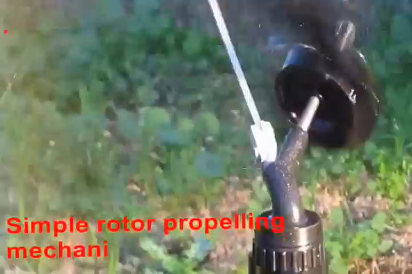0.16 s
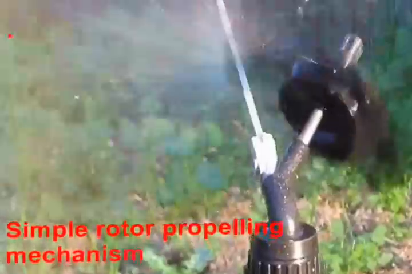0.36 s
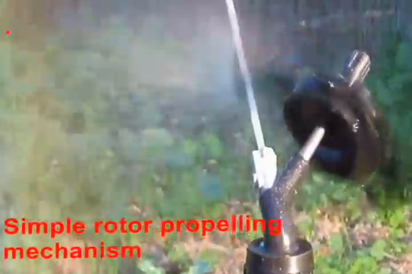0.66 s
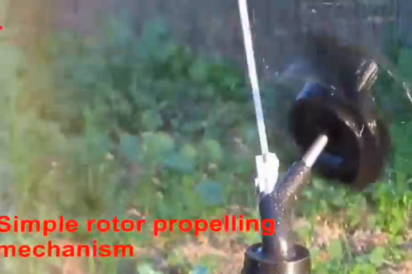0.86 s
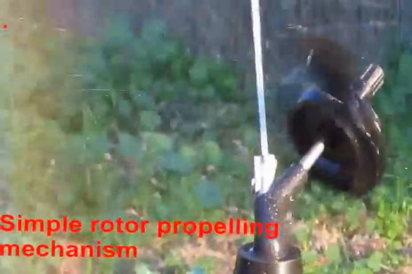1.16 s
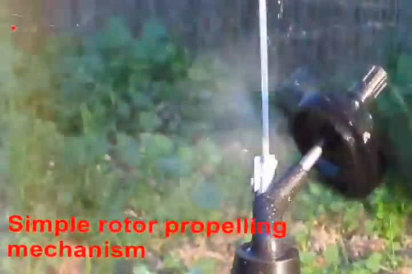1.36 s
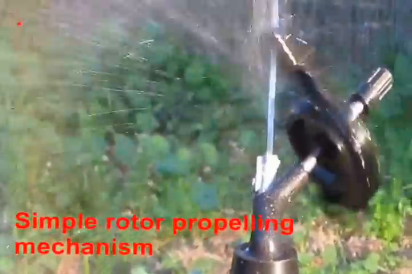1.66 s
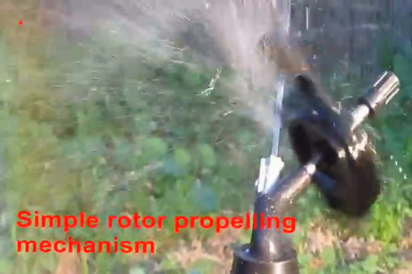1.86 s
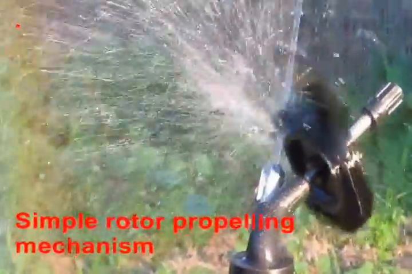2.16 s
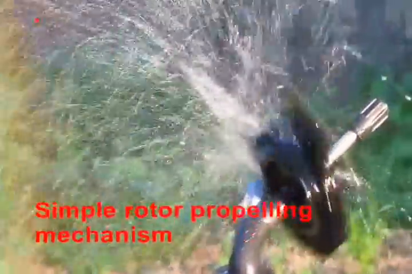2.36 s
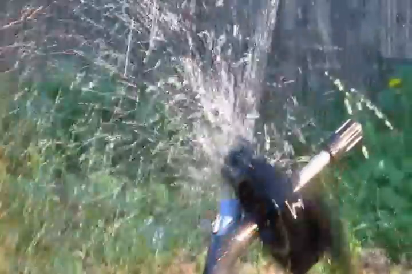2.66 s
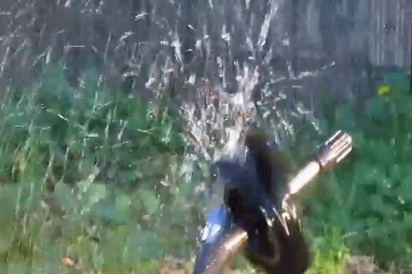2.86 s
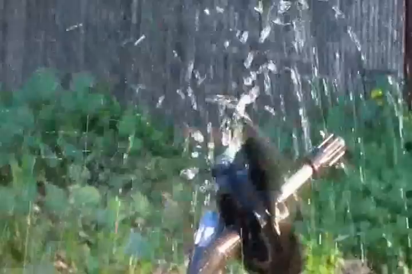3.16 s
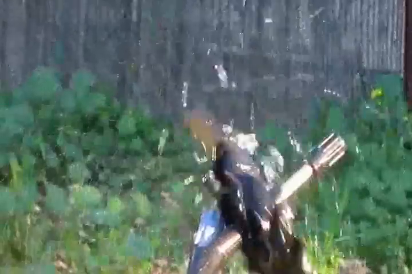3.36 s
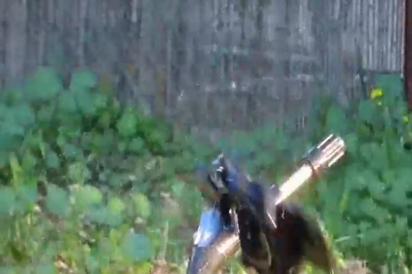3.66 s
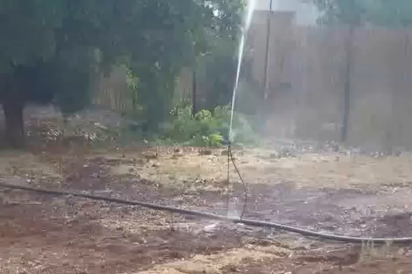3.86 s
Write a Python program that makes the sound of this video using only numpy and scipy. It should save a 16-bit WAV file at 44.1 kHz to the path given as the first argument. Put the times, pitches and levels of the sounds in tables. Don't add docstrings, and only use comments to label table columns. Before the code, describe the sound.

A sprinkler's spinning vane chops a water jet in fast, regular wet slaps over steady hiss.

```python
import sys
import numpy as np
from scipy import signal
from scipy.io import wavfile
from scipy.ndimage import uniform_filter1d

SR = 44100
rng = np.random.default_rng(int(sys.argv[2]) if len(sys.argv) > 2 else 0)


def bounce(signal):
    frames = np.transpose(np.atleast_2d(signal))
    limited = np.clip(frames, -1, 1)
    pcm = np.round(limited * 32767).astype(np.int16)
    wavfile.write(sys.argv[1], SR, pcm)


def boost_factor(decibels):
    exponent = np.asarray(decibels, float) / 20
    return 10 ** exponent


N = 176400

FADE_FROM_S, FADE_TO_S = 2.885, 3.845
SOFT_EDGE_HZ = 15800
PASS_MS = np.arange(2000) * 1000 / SR


def evened(x):
    return x / np.sqrt(np.mean(x ** 2) + 1e-20)


def coloured(x, points):
    hz = abs(np.fft.fftfreq(8192, 1 / SR))
    point_hz, point_db = np.transpose(points)
    log_gain = np.interp(np.log(hz + 1), np.log(point_hz + 1), point_db) * np.log(10) / 20
    taps = np.fft.ifft(np.exp(np.conj(signal.hilbert(log_gain)))).real[:4096]
    return signal.oaconvolve(x, taps / np.linalg.norm(taps))[:len(x)]


def edged(x, hz):
    return signal.oaconvolve(x, signal.firwin(511, hz, window=("kaiser", 8), fs=SR), "same")


def blend(x, first, second, share):
    share = np.clip(share, 0, 1)
    return np.sqrt(1 - share) * coloured(x, first) + np.sqrt(share) * coloured(x[::-1], second)


def ring(x, hz, width_hz):
    radius = np.exp(-np.pi * width_hz / SR)
    angle = 2 * np.pi * hz / SR
    return evened(signal.lfilter([1], [1, -2 * radius * np.cos(angle), radius ** 2], x))


def bump(ms, at, width):
    return np.exp(-.5 * ((ms - at) / width) ** 2)


def burst(shape, noise):
    x = shape * noise
    return x * np.linalg.norm(shape) / (np.linalg.norm(x) + 1e-12)


def add(mix, s, sound):
    part = mix[max(round(s * SR), 0):][:len(sound)]
    part += sound[:len(part)]


def fade():
    return np.clip((FADE_TO_S - np.arange(N) / SR) / (FADE_TO_S - FADE_FROM_S), 0, 1)


def control(column):
    # time_s, hiss_level_db, vane_bite [0-1]
    head_turn = [(0, -36, 1), (0.053, -32.5, 0.75), (0.132, -40.5, 0.42), (1.051, -42.5, 0.56),
                 (1.4, -42, 0.83), (1.952, -39.5, 0.88), (2.3, -40.5, 0.82), (2.55, -41, 0.9),
                 (2.75, -42.5, 0.9), (2.95, -44, 0.95), (3.201, -42, 0.9), (3.85, -42.5, 0.94)]
    points = np.array(head_turn)
    return np.interp(np.arange(N) / SR, points[:, 0], points[:, column])


def droplets(grain_ms, spread_db):
    decay = np.exp(-1000 / (grain_ms * SR))
    flicker = evened(signal.lfilter([1], [1, -decay], rng.standard_normal(N)))
    return evened(rng.standard_normal(N) * boost_factor(spread_db * flicker))


def jet():
    # frequency_hz, density_db
    hiss_colour = [(30, -3), (130, -1), (400, -10.5), (1660, -9), (4370, -10.5), (5120, -5), (11800, -11),
                   (15800, -4)]
    # frequency_hz, density_db
    mist_colour = [(30, -3), (100, 4.5), (400, -3.5), (971, -2), (3000, -4), (5600, -6.5), (9820, -7),
                   (15000, -12.5)]
    falling = blend(droplets(grain_ms=1.5, spread_db=0.43), hiss_colour, mist_colour, control(column=2))
    z = signal.stft(falling, nperseg=256)[2]
    patches = uniform_filter1d(rng.standard_normal(z.shape), 12, 0)
    patches = evened(uniform_filter1d(patches, 8, 1))
    patchy = signal.istft(z * boost_factor(0.72 * patches), nperseg=256)[1][:N]
    return edged(evened(patchy), SOFT_EDGE_HZ) * boost_factor(control(column=1)) * fade()


def passes():
    # start_s, spray_db, slap_delay_ms, slap_db, contact_change_ms, low_splash_change_db
    splashes = [
        (.008, -21.5, 9, -25, 1.5, 0),
        (0.0221, -30, 3, -21, -3, -6),
        (0.0698, -20.5, 2.5, -25, -4, -9.5),
    ]
    # start_s, spray_db, slap_delay_ms, slap_db, slap_ring_hz
    grazing = [(0.0903, -28, 2.44, -17, 5730), (0.158, -30, 4.4, -17.5, 5460),
               (0.2268, -32, 3.8, -16.5, 5750), (0.2962, -31.5, 3.4, -18.5, 6300),
               (0.365, -31, 3.75, -16.5, 5050), (0.4333, -29.5, 4, -18, 6100),
               (0.5019, -29.5, 4.24, -16, 6080), (0.5721, -33, 2.77, -16, 5570),
               (0.6409, -30.5, 4.5, -17.5, 5260), (0.7112, -30, 3.1, -17, 5100),
               (0.7816, -30.5, 2.95, -18, 5620), (0.8498, -31, 3.56, -17.5, 5670),
               (0.9184, -29.5, 3, -17, 7060), (0.9884, -27.5, 3.6, -15.5, 6460),
               (1.055, -29, 3.5, -16.5, 5970), (1.1222, -27.5, 2.1, -21.5, 6900),
               (1.1897, -28, 3.25, -17, 6330), (1.255, -27.5, 0.75, -20.5, 6700),
               (1.3201, -29, 0.59, -26, 5440), (1.3842, -28, 3.1, -13, 6660)]
    # start_s, spray_db, slap_delay_ms, slap_db
    biting = [(1.447, -27, 1.9, -28), (1.5109, -26.5, 4.2, -19.5), (1.5753, -27.5, 4.2, -40),
              (1.6378, -28, 0.87, -15.5), (1.7007, -27, 12, -23), (1.7646, -24.5, 8.9, -26.5),
              (1.8275, -27.5, 1.1, -16), (1.8907, -25, 0.34, -24), (1.9528, -26.5, 10.9, -37),
              (2.0159, -25.5, 3.5, -20), (2.079, -24.5, 1.2, -32), (2.1418, -27, 10.8, -15.5),
              (2.2034, -24.5, 12.3, -21.5), (2.2661, -25, 2.8, -41), (2.3282, -25.5, 4.3, -22.5),
              (2.3885, -26.5, 7.3, -36), (2.4486, -27, 0.71, -36), (2.5098, -27.5, 3.6, -15.5),
              (2.5697, -27, 1.05, -22), (2.6297, -27, 8.0, -16)]
    # start_s, spray_db, slap_delay_ms, slap_db
    receding = [(2.6887, -28, 0.92, -14), (2.748, -28.5, 1.5, -20), (2.8061, -30.5, 8.5, -44),
                (2.8646, -29.5, 4.7, -39), (2.9239, -30.5, 1.7, -25), (2.9831, -30, 5.6, -27),
                (3.0413, -32.5, 8.7, -37), (3.1011, -30, 3.6, -40), (3.1589, -32, 9.8, -26),
                (3.2185, -32.5, 9.3, -26), (3.2767, -32.5, 1.1, -33), (3.3352, -32.5, 1.8, -37),
                (3.394, -35, 0.79, -26), (3.4526, -36.5, 10.2, -25), (3.5112, -39, 1.8, -26),
                (3.5705, -39, 0.26, -29), (3.6287, -42, 8.2, -47), (3.6874, -44.5, 3.7, -36),
                (3.7456, -47.5, 18, -47), (3.804, -58, 1.15, -42.5)]

    def with_usual_ring(table):
        return [tuple(row[:4]) + (5800,) for row in table]

    rows = with_usual_ring(splashes) + [tuple(row) for row in grazing]
    rows = np.array(rows + with_usual_ring(biting) + with_usual_ring(receding))
    trims = np.zeros((len(rows), 2))
    trims[:len(splashes)] = np.array(splashes)[:, 4:]
    return rows, trims


def held_spray(level_db, deep, after_ms):
    rise_ms, shed_ms, sag_db_per_ms = 0.55, 6, -0.24
    shed_gain = boost_factor(-8)
    level = boost_factor(level_db + sag_db_per_ms * (0.5 - deep) * (PASS_MS + 4.0))
    shed = shed_gain * np.exp(-(after_ms / shed_ms) ** 2) + np.exp(-after_ms / .6)
    return level * np.minimum(PASS_MS / rise_ms, 1) * shed / (1 + shed_gain)


def low_splash(level_db, after_ms):
    lag_ms, fall_ms = 1.6, 3.1
    rise = np.minimum(PASS_MS / 1.8, 1)
    return boost_factor(level_db) * rise * np.exp(-np.maximum(after_ms - lag_ms, 0) / fall_ms)


def slap_shape(at_ms, entry_chance, rebound_chance):
    entry = boost_factor(-14 + 2 * entry_chance) * bump(PASS_MS, 0.43 * at_ms, 0.2 * at_ms + .1)
    rebound = boost_factor(-13.5 + 2 * rebound_chance) * bump(PASS_MS, at_ms + 3.04, 1.0)
    return bump(PASS_MS, at_ms, 0.46) + entry + rebound


def thud(level_db, stop_ms):
    return boost_factor(level_db - 15) * bump(PASS_MS, stop_ms, 3.35) * np.sin(2 * np.pi * 259 * PASS_MS / 1000)


def spray_noise(bite):
    # frequency_hz, level_db
    thin_colour = [(180, -27), (300, -20.5), (2350, -11), (3160, 5), (5650, -0.5), (6560, -4.5),
                   (10400, 8.5), (15800, -3)]
    # frequency_hz, level_db
    full_colour = [(180, -42.5), (300, -13), (2050, -1.5), (5940, -0.5), (7250, -1.5), (9770, 1),
                   (12900, -4), (15800, -9)]
    # frequency_hz, width_hz, level_db
    wheel_modes = [(694, 100, -10.5), (966, 65, -7), (1208, 54, -8.5), (1870, 150, -8.5), (2470, 240, -2.5)]
    spray = blend(droplets(grain_ms=0.2, spread_db=2.5), thin_colour, full_colour, bite)
    clumps = evened(uniform_filter1d(uniform_filter1d(rng.standard_normal(N), 60), 60))
    spray = edged(evened(spray * boost_factor(0.67 * clumps)), SOFT_EDGE_HZ)
    bass = signal.sosfilt(signal.butter(2, 1490, fs=SR, output="sos"), spray)
    stir = rng.standard_normal(N)
    wheel = sum(boost_factor(db - 10.5) * ring(stir, hz, width_hz) for hz, width_hz, db in wheel_modes)
    return spray - bass, bass + np.clip(bite, 0, 1) * wheel


def vane():
    # frequency_hz, level_db
    slap_colour = [(1000, -44), (2000, -30), (3140, -26.5), (5740, 1), (7500, -1.5), (9330, 1), (11400, 1),
                   (14400, -3), (16300, -48)]
    # frequency_hz, level_db
    tick_colour = [(500, 1), (2000, -6.5), (5000, -9.5), (10000, 6), (14500, 1), (16500, -20)]
    # time_s, peak_db
    stray_drops = [(.0355, -27), (.046, -31), (.0618, -24), (.4755, -40), (.5172, -23), (.6565, -19),
                   (1.107, -33), (3.013, -41), (3.62, -51), (3.6675, -53), (3.7985, -61)]
    deep_from_s, deep_by_s = 0.9, 1.9
    tick_ms = .2
    rows, trims = passes()
    turn_times_ms = 1000 * np.clip(np.gradient(rows[:, 0]), .058, .07)
    slap_noise = coloured(rng.standard_normal(N + 2000), slap_colour)
    hold, low, slaps, ticks, rung, thuds = np.zeros((6, N))
    chances = rng.standard_normal((len(rows), 6))
    noises = rng.standard_normal((len(rows), 2000))
    for row, turn_ms, chance, noise, trim in zip(rows, turn_times_ms, chances, noises, trims):
        s, spray_db, at_ms, slap_db, ring_hz = row
        contact_change_ms, low_db = trim
        deep = np.clip((s - deep_from_s) / (deep_by_s - deep_from_s), 0, 1)

        stop_ms = 0.19 * turn_ms + 3.5 * (1 - deep) * (s > .08) + 0.48 * chance[0] + contact_change_ms
        after_ms = np.maximum(PASS_MS - stop_ms, 0)
        add(hold, s, held_spray(spray_db, deep, after_ms))
        brush = (s > .1) * (1 - deep) * boost_factor(-43.5 + 3.1 * chance[5]) * bump(PASS_MS, 10.5, 2.2)
        add(hold, s - .022, brush)
        add(low, s, low_splash(spray_db + low_db + 1.6 * chance[3], after_ms))

        slap = (1 - deep) * boost_factor(slap_db) * slap_shape(at_ms, chance[1], chance[2])
        add(slaps, s, burst(slap, slap_noise[round(s * SR):][:len(PASS_MS)]))
        add(rung, s, burst(slap, ring(noise, ring_hz, width_hz=350)))

        dry_tick = deep * boost_factor(min(slap_db, spray_db + 13)) * bump(PASS_MS, at_ms, tick_ms)
        exit_tick = boost_factor(spray_db - 16 + 2.2 * chance[4]) * bump(PASS_MS, stop_ms - .4, tick_ms)
        add(ticks, s, burst(dry_tick, noise) + burst(exit_tick, noise[::-1]))
        add(thuds, s, thud(spray_db + low_db + 0.5 * chance[5], stop_ms))
    for s, db in stray_drops:
        tap = boost_factor(db) * bump(PASS_MS, 0.6, tick_ms)
        add(ticks, s, burst(tap, rng.standard_normal(len(PASS_MS))))
    spray, bass = spray_noise(control(column=2))
    crack = boost_factor(2.5) * slaps + boost_factor(1) * rung
    crack = signal.sosfilt(signal.butter(2, 2200, "high", fs=SR, output="sos"), crack)
    return hold * spray + low * bass + crack + coloured(ticks, tick_colour) + thuds


def hum():
    # time_s, pitch_hz, level_db
    motor_curve = [(0, 54, -47), (.1, 56, -51), (.17, 66, -64), (1.03, 67.5, -66), (1.18, 68, -57.5),
                   (1.5, 68, -50.5), (1.9, 68, -46), (2.2, 68, -49), (2.35, 68, -55), (2.55, 68, -51),
                   (2.78, 68, -56), (2.95, 68, -50), (3.16, 68, -59), (3.33, 68.4, -50.5), (3.55, 69, -57),
                   (3.75, 72, -52)]
    width_hz, sway_db = .8, .5
    wander = evened(signal.lfilter([1], [1, -np.exp(-30. / SR)], rng.standard_normal(N)))
    s, hz, db = np.transpose(motor_curve)
    t = np.arange(N) / SR
    pitch_hz = np.interp(t, s, hz) + width_hz * wander
    tone = np.sqrt(2) * np.sin(2 * np.pi * np.cumsum(pitch_hz) / SR)
    sway = sway_db * np.roll(uniform_filter1d(wander, 2000), SR)
    return tone * boost_factor(np.interp(t, s, db) + sway) * fade()


def knocks():
    # time_s, pitch_hz, width_ms, level_db
    wheel_knocks = [
        (.014, 921, 4, -30),
        (.0175, 2400, .9, -22),
        (.013, 4100, .8, -21),
        (.018, 9000, .5, -17),
        (.0677, 11500, .16, -4),
        (.0677, 7500, .14, -11),
        (.0765, 8200, .5, -17),
    ]
    ms = np.arange(N) * 1000 / SR
    mix = np.zeros(N)
    for s, hz, width_ms, db in wheel_knocks:
        mix += boost_factor(db) * bump(ms, 1000 * s, width_ms) * np.sin(2 * np.pi * hz * ms / 1000)
    return mix


def ending():
    # frequency_hz, level_db
    blip_colour = [(250, 1.5), (700, 4.5), (3130, 3.5), (5740, 0), (12300, -4), (15200, -3), (16500, -22.5)]
    blip_s, blip_ms, blip_db = 3.848, 7., -38.5
    t = np.arange(N) / SR
    tail_db = -83 - 120 * np.maximum(t - FADE_TO_S, 0)
    tail = boost_factor(tail_db) * edged(rng.standard_normal(N), SOFT_EDGE_HZ)
    ms = 1000 * (t - blip_s)
    release = boost_factor(-20.5 - 4.5 * np.maximum(ms - blip_ms, 0))
    gate = (ms > 0) * np.where(ms < blip_ms, 1, release)
    push = boost_factor(-41.5) * bump(ms, 3.8, 0.83) * (ms < blip_ms)
    thin_ring = boost_factor(-50.5) * gate * np.sin(2 * np.pi * 1040 * t)
    blip = boost_factor(blip_db) * gate * coloured(rng.standard_normal(N), blip_colour)
    return tail + push + thin_ring + blip


def scene():
    mix = jet() + vane() + hum() + knocks() + ending()
    return (mix * (np.arange(N) / SR < 3.889))[None]


def low_pass(x):
    return signal.sosfilt(signal.butter(12, 16970, fs=SR, output="sos"), x)


def record(dry):
    mix = edged(dry[0], 16980)[None]
    return low_pass(mix)


dry = scene()
out = record(dry)
bounce(out)
```